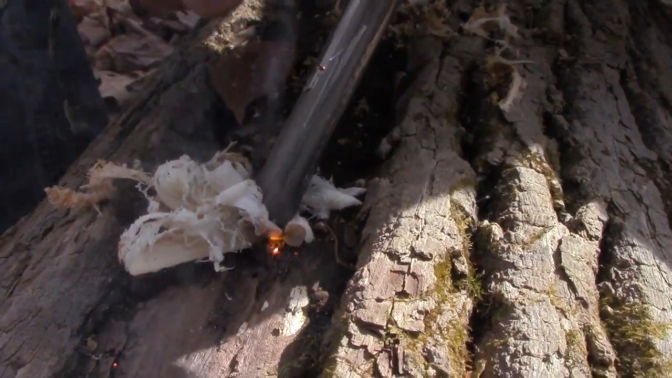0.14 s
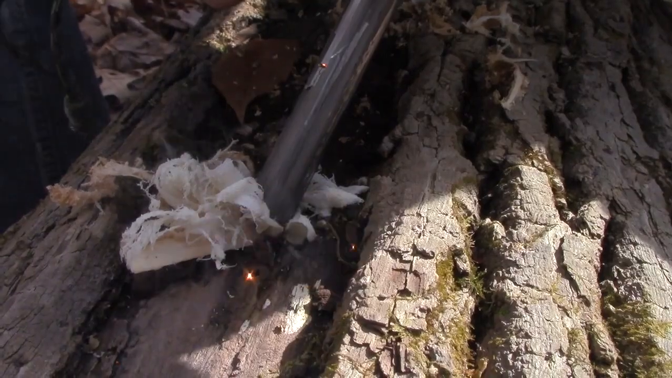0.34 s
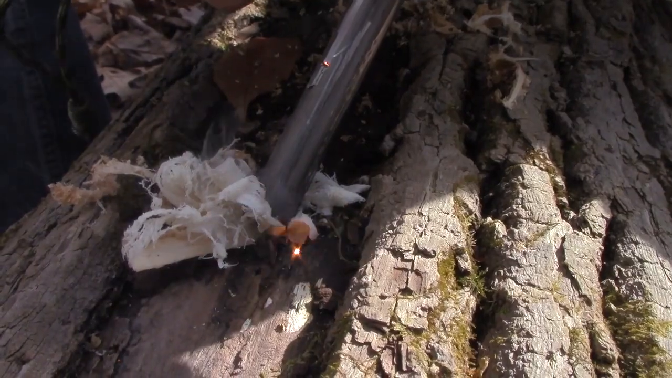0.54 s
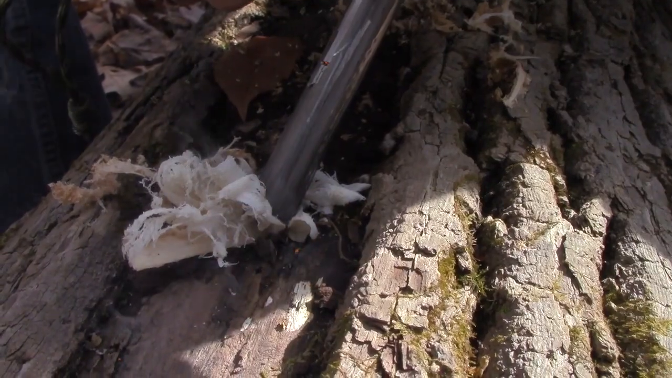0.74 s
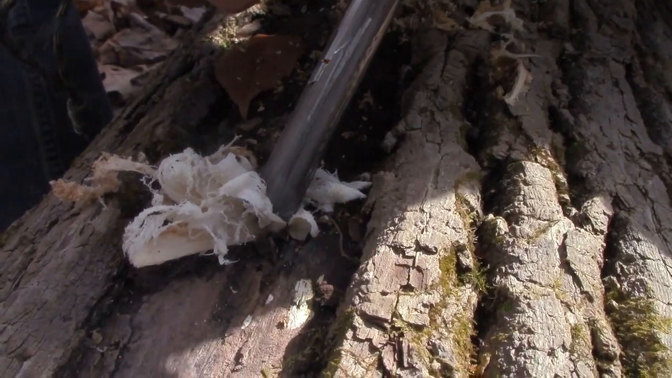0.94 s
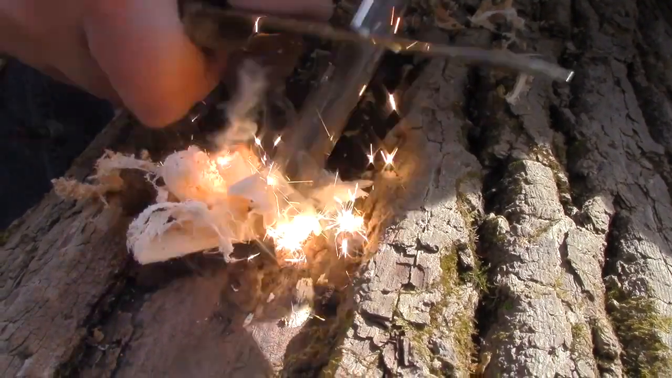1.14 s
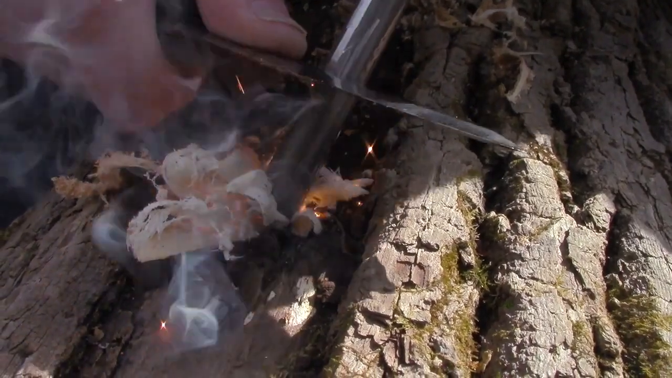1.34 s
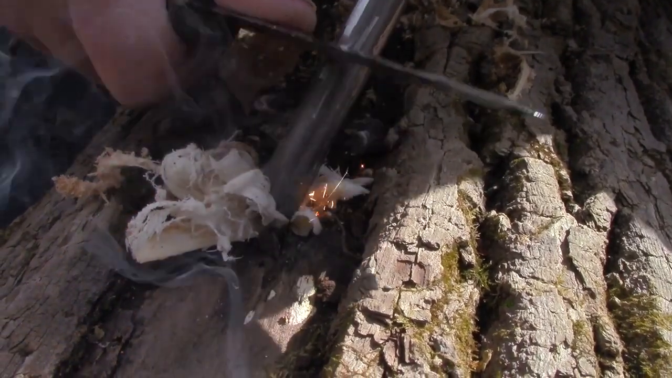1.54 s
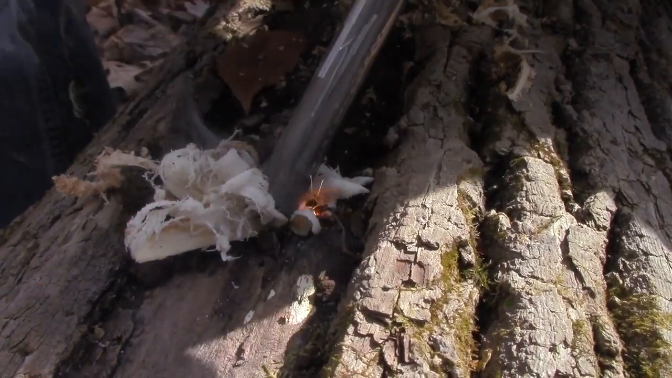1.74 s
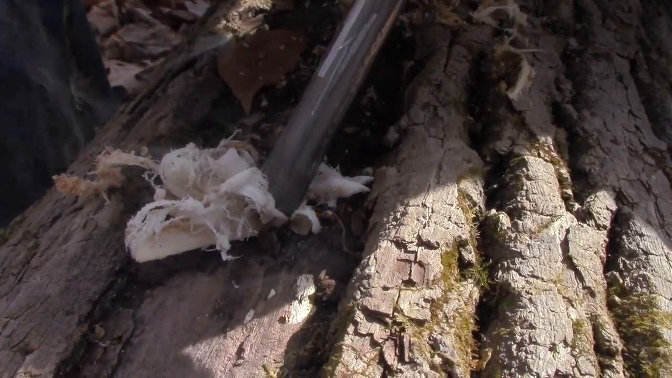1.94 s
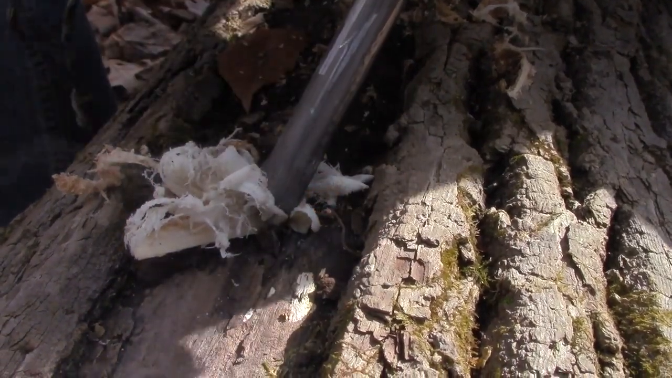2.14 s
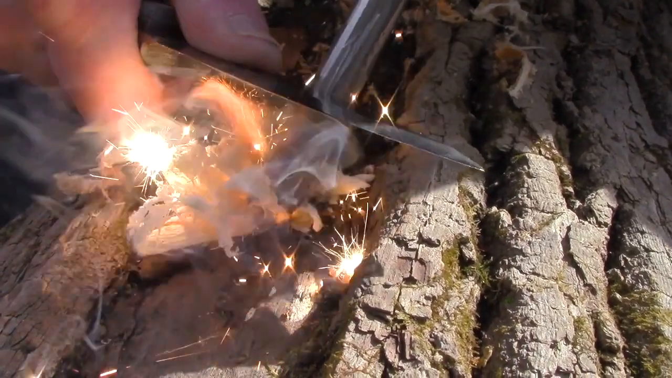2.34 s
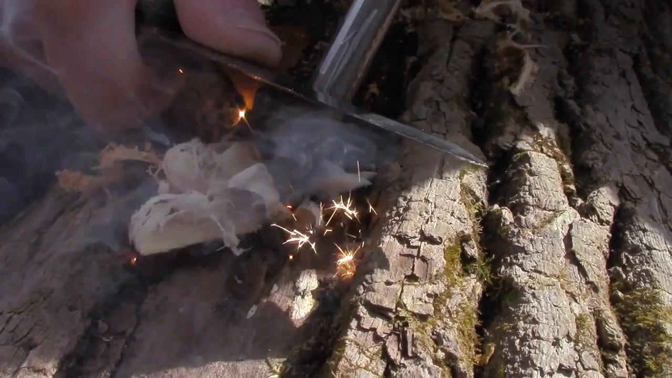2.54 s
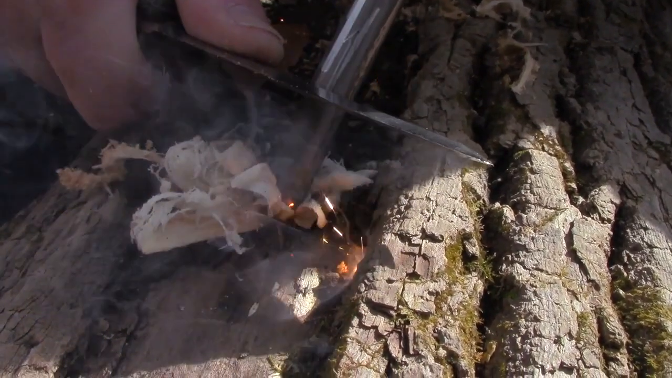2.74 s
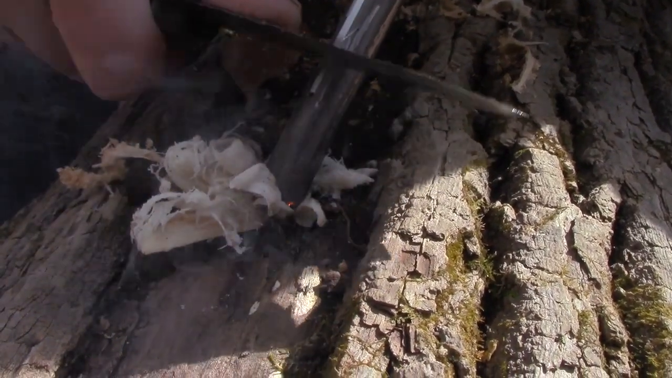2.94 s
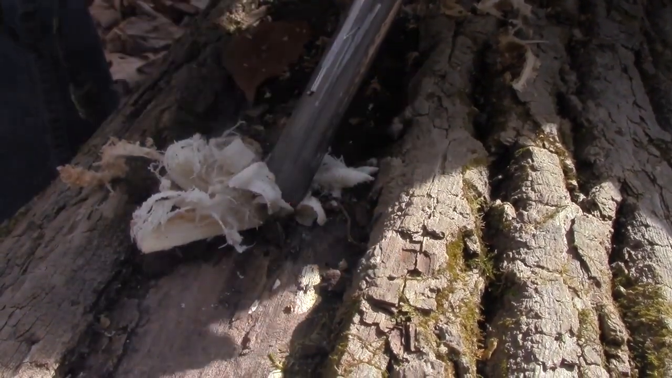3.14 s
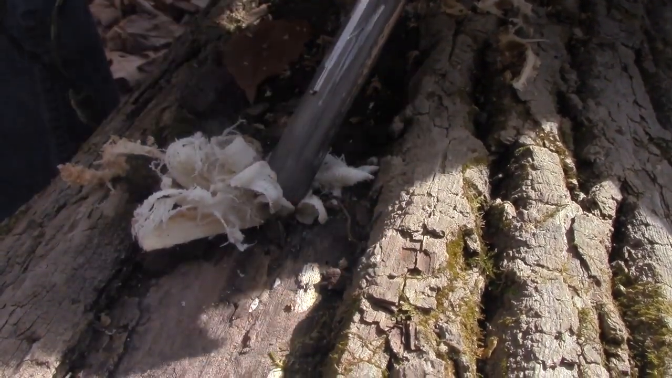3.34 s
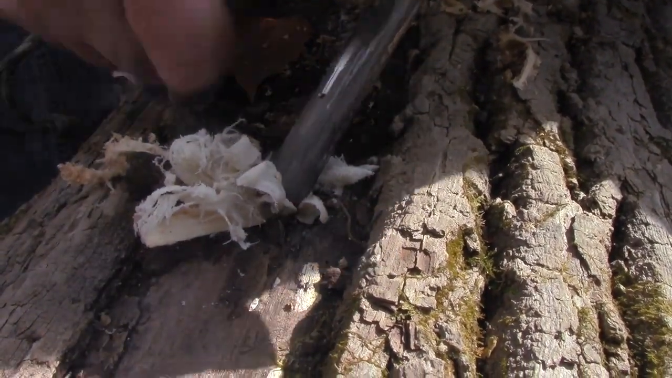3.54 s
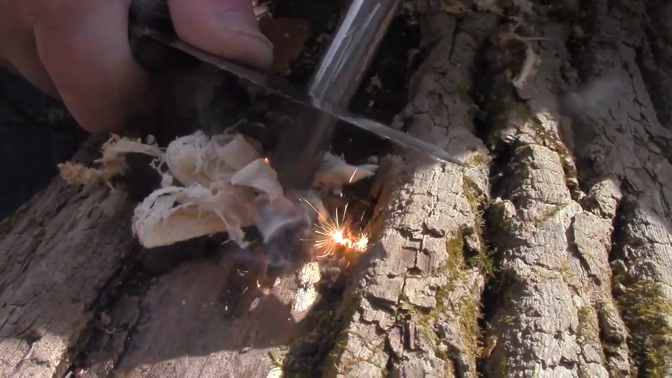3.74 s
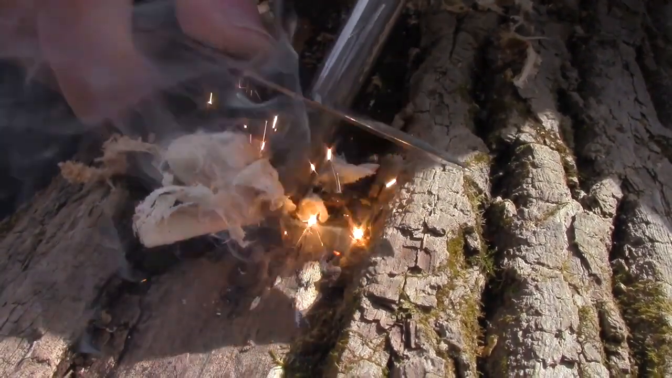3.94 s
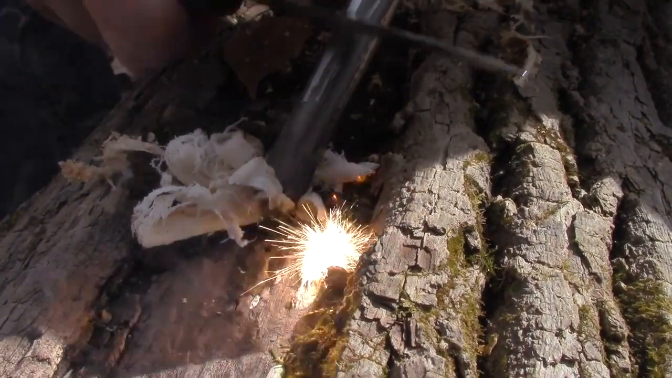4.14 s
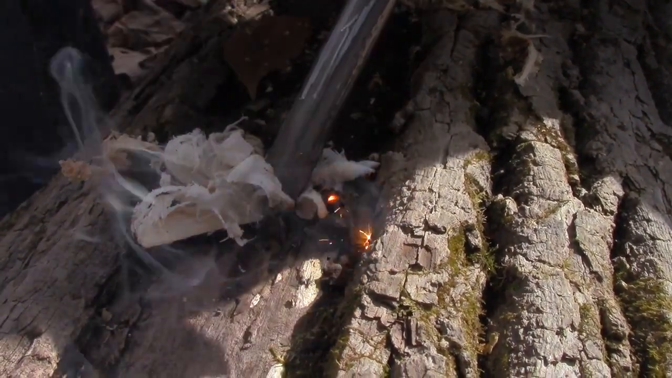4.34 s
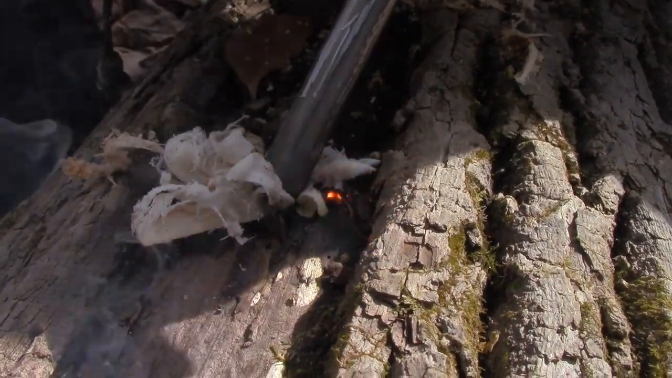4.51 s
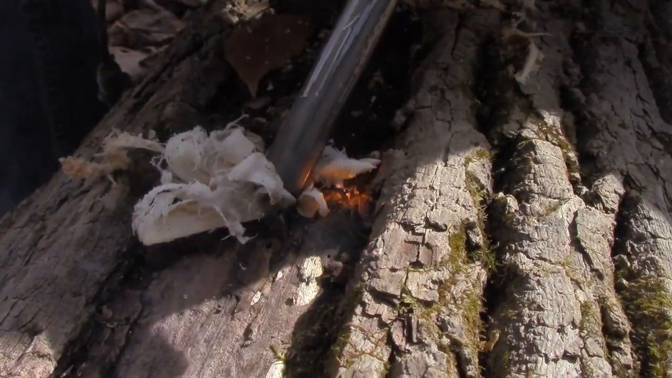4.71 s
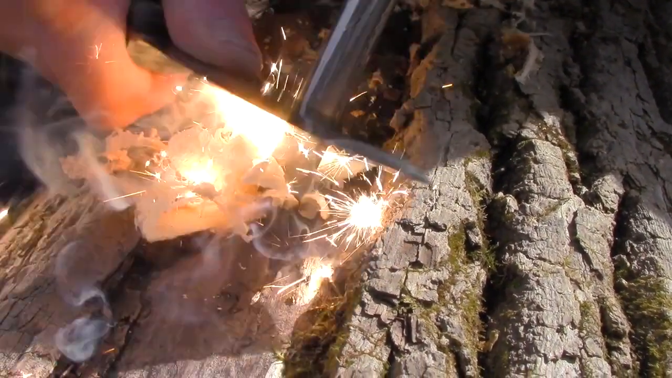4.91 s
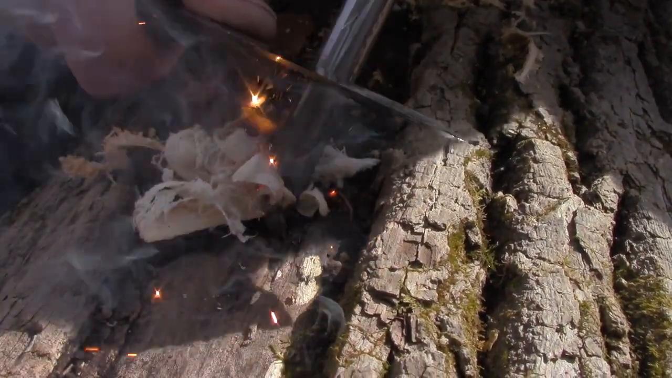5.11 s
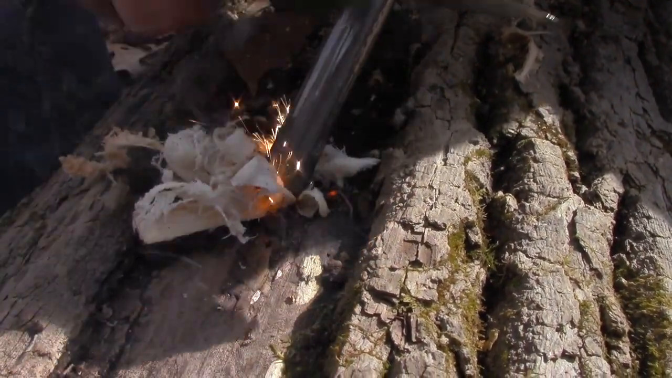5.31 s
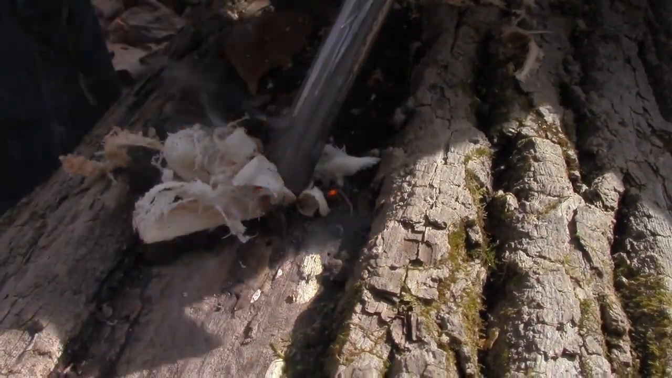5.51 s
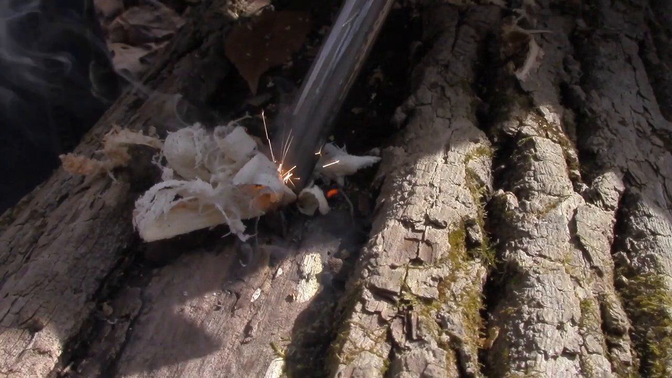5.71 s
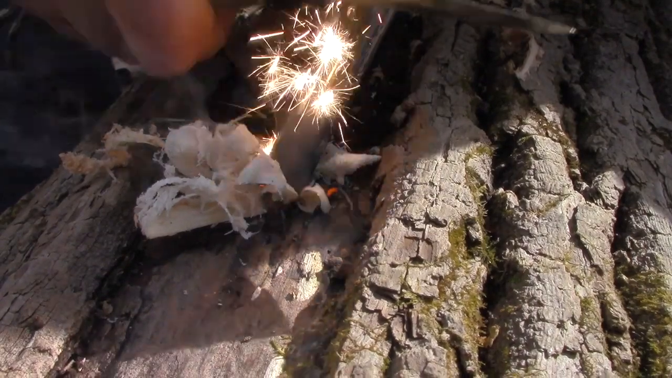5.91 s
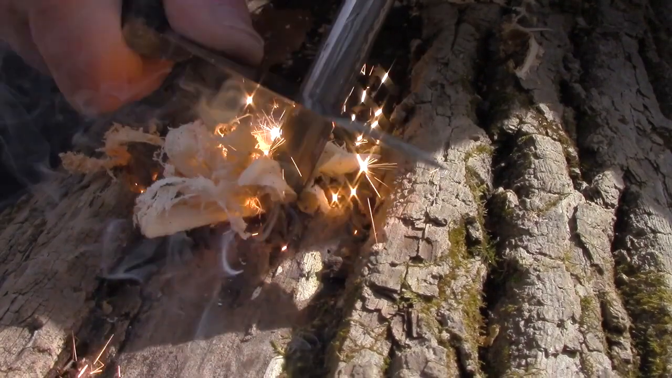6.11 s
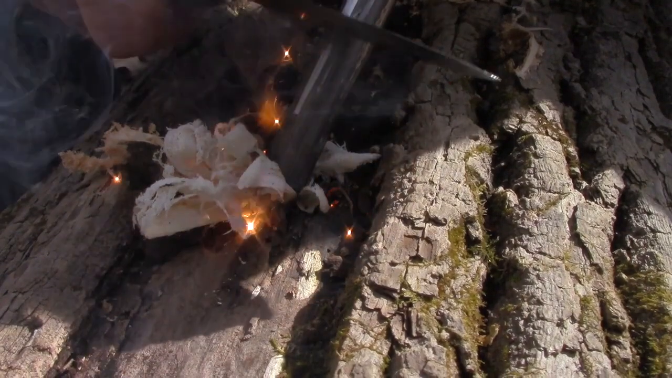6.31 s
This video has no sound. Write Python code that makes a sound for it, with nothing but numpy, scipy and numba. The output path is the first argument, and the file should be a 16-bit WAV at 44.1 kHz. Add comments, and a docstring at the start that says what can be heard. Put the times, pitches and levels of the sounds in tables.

```python
"""Striking a metal fire rod

A steel knife spine rasps down a metal fire rod close by: noise of tearing asperities rings the modes of the steel.
Torn-off shavings fizz, roar and pop as they burn: random grit and clicks through resonances and a broad filter.
Between strokes the blade slides lightly back up: friction noise in lightly damped modes, with taps and a knock.
Far traffic (filtered noise) and a wavering engine hum (a gliding sine) lie underneath."""
import sys
import numpy as np
from scipy import signal
from scipy.fft import rfft, irfft
from scipy.io import wavfile
from scipy.ndimage import uniform_filter1d
from numba import njit

SR = 44100
rng = np.random.default_rng(int(sys.argv[2]) if len(sys.argv) > 2 else 0)


def generate_wav(signal):
    """Clip the signal to [-1, 1] and save it as 16-bit WAV at the path in sys.argv[1]."""
    frames = np.transpose(np.atleast_2d(signal))
    scaled = np.clip(frames, -1, 1) * 32767
    pcm = np.round(scaled).astype(np.int16)
    wavfile.write(sys.argv[1], SR, pcm)


N = 284968

CUT_ATTACK_S, CUT_FADE_S = 0.027, 0.0224  # the fade is the time to fall 60 dB
CUT_SAG_DB_PER_S, SHRILL_SAG_DB_PER_S = 49, 64
JOLT_FADE_S = 0.2  # time to fall 60 dB


def strokes():
    """Superposition: asperities tear and ring the steel while the burning shavings fizz, roar and snap."""
    cut, lowest, treble, thrown, shrill, jolt = cutting_powers()
    burn, roaring, flaring = burning_powers()
    tearing = grit(rate=1600, spread_db=1.0, tail_s=0.00036, bed=1.0)
    sparks = sputter(burn)
    burning = fizz(burn + thrown, sparks) + hisses(tearing) + roar(roaring, cut, sparks) + snaps(flaring)
    return burning + bite(cut, lowest, treble, shrill, burn, tearing) + thuds(jolt)


# The edge cutting into the rod: (time [s], length [s], level [dB]), then relative to the cut:
# (lowest mode of the steel [dB], treble of the steel [dB], sputter of sparks [dB]),
# (jolt through the log, a level of its own [dB]), (shrill mode at the start, relative to the cut [dB])
CUT_EVENTS = [(1.026, 0.081, -10.5, -10.5, -9.5, -4.5, -43, -7),
              (2.194, 0.075, -9.5, -6.5, -8, -5, -33.5, -4.5),
              (3.431, 0.079, -12.5, -5.5, -13.5, -2, -38.5, -5),
              (3.55, 0.068, -12.5, -1.5, -10, -13.5, -30.5, -8),
              (4.806, 0.058, -10.5, -7, -4.5, -7.5, -39, -3.5),
              (5.862, 0.088, -13, -10, -6, -2.5, -43, -1.5), (6.001, 0.071, -14.5, -3, -7, -0.5, -62, -12)]


def cutting_powers():
    """Intermittent friction: each cut shares its power among steel modes, thrown sparks and a jolt."""
    t = np.arange(N) / SR
    cut, lowest, treble, thrown, shrill, jolt = np.zeros((6, N))
    for s, length, db, low_db, treble_db, sparks_db, jolt_db, shrill_db in CUT_EVENTS:
        power = swell(s, CUT_ATTACK_S, length - CUT_ATTACK_S, CUT_FADE_S, db)
        power = power * undb(-CUT_SAG_DB_PER_S * np.abs(t - s)) ** 2
        cut += power
        lowest += power * undb(low_db) ** 2
        treble += power * undb(treble_db) ** 2
        thrown += power * undb(sparks_db) ** 2
        shrill += power * undb(shrill_db - SHRILL_SAG_DB_PER_S * np.abs(t - s)) ** 2
        jolt += swell(s + length / 2, length / 2, 0.0048, JOLT_FADE_S, jolt_db)
    return cut, lowest, treble, thrown, shrill, jolt


# Modes of blade and rod pressed hard together: (frequency [Hz], width [Hz], relative level [dB])
PRESSED_MODES = [(1990, 1200, -10.5), (4430, 2100, -6.5), (6340, 1050, -1.5), (8050, 1150, -4.5),
                 (10970, 2200, -20), (12900, 1300, -17.5)]
STEEL_DB, STEEL_LOW_DB, STEEL_TREBLE_DB = -9, -5, -14  # steel over burning; lowest and treble over steel


def bite(cut, lowest, treble, shrill, burn, tearing):
    """Modal resonance: tearing noise drives the steel, which also rings along with the burning."""
    bands = PRESSED_MODES[:1], PRESSED_MODES[1:3], PRESSED_MODES[3:4], PRESSED_MODES[4:]
    low, middle, upper, high = (
        unit(modes(tearing, band, sway_db=2.44, drift=0.027, steep=True)) for band in bands)
    steel = burn * undb(STEEL_DB) ** 2
    out = smooth(lowest + steel * undb(STEEL_LOW_DB) ** 2) * low
    out = out + smooth(cut + steel) * middle
    out = out + smooth(treble + steel * undb(STEEL_TREBLE_DB) ** 2) * (high + upper)
    return out + smooth(shrill) * upper


def thuds(jolt):
    """Low-frequency structural transmission: each cut jolts the log, heard as noise below 62 Hz."""
    thud = signal.lfilter(*signal.butter(2, 62, fs=SR), rng.standard_normal(N))
    return smooth(jolt) * unit(thud)


# Showers of shavings burning after each full stroke: one list per shower of (time [s], level [dB])
SHOWER_LEVELS = [
    [(1.1, -26.5), (1.125, -13.5), (1.15, -15.5), (1.188, -14.5), (1.21, -14.5), (1.316, -25),
     (1.34, -31.5), (1.49, -52.5)],
    [(2.21, -27.5), (2.27, -12.5), (2.372, -13), (2.398, -24), (2.44, -17), (2.49, -34.5), (2.56, -29),
     (2.72, -26.5), (2.73, -35.5), (2.835, -36.5)],
    [(3.655, -31), (3.679, -19.5), (3.699, -18.5), (3.735, -15), (3.769, -21.5), (3.809, -11), (3.9, -13.5),
     (3.92, -19), (4.12, -41.5)],
    [(4.84, -13.5), (4.885, -8), (4.992, -15), (5.02, -21), (5.145, -43)],
    [(5.89, -31), (5.955, -12), (6.01, -16.5), (6.086, -23), (6.12, -15), (6.19, -24), (6.24, -29),
     (6.27, -29.5)],
]
# Roar over fizz, one for each shower: (relative level [dB])
SHOWER_ROAR = [-1, -1.5, -5, -3, -1.5]
# Single shavings flaring up: (time [s], rise [s], hold [s],
# fade to -60 dB, at least 1 ms [s], level [dB], roar over fizz [dB])
FLARE_EVENTS = [(0.049, 0.0011, 0.0043, 0.16, -15, -7.5), (0.216, 0.011, 0.02, 0.09, -26.5, -5),
                (0.23, 0.015, 0.008, 0.0645, -19.5, -2.5), (0.472, 0.00069, 0.04, -0.11, -14.5, -7),
                (0.481, 0.015, 0.0064, -0.08, -10.5, -22), (1.548, 0.0064, 0.0025, 0.13, -13.5, -8),
                (1.709, 0.00065, 0.03, 0.09, -19, -6.5), (1.748, 0.0073, 0.0016, 0.1239, -17.5, -11),
                (2.463, 0.0044, 0.0051, 0.2, -18, -4), (2.576, 0.0043, 0.019, 0.53, -23.5, -5.5),
                (2.672, 0.022, 0.015, 0.1342, -16.5, -11.5), (3.714, 0.002, 0.0086, -0.04, -11, -8.5),
                (4.15, 0.0025, 0.018, 0.59, -23, -4.5), (4.175, 0.0043, 0.0046, 0.09, -6.5, -8),
                (4.215, 0.0041, 0.024, 0.03, -19.5, -8.5), (4.267, 0.0037, 0.0018, 0.22, -14, -6.5),
                (4.349, 0.0085, 0.004, 0.12, -20.5, -7.5), (4.56, 0.00048, 0.037, 0.33, -15, -12),
                (5.068, 0.0022, 0.0046, 0.21, -21.5, 0.5), (5.146, 0.00033, 0.0056, 0.3, -20, -1.5),
                (5.203, 0.0028, 0.0034, 0.214, -15.5, -2.5), (5.282, 0.0011, 0.092, 0.17, -22.5, -3.5),
                (5.311, 0.0167, 0.019, -0.0151, -18.5, -3), (5.354, 0.0032, 0.013, 0.06, -10, -7),
                (5.74, 0.0011, 0.0015, 0.07, -26.5, -11), (6.256, 0.0012, 0.067, 0.12, -21.5, -4.5)]
EMBER_DB, EMBER_FADE_S = -29.5, 0.34  # each flare leaves a faint glowing tail


def burning_powers():
    """Incoherent addition: the powers of showers and single flares sum, with their roar weighted apart."""
    t = np.arange(N) / SR
    burn, roaring, flaring = np.zeros((3, N))
    for rows, roar_db in zip(SHOWER_LEVELS, SHOWER_ROAR):
        s, db = np.transpose(rows)
        power = undb(np.interp(t, s, db, left=-200, right=-200)) ** 2
        burn += power
        roaring += power * undb(roar_db) ** 2
    for s, rise, hold, fade, db, roar_db in FLARE_EVENTS:
        ember = swell(s, rise, hold, EMBER_FADE_S, db + EMBER_DB)
        power = swell(s, rise, hold, fade, db) + ember
        burn += power
        roaring += power * undb(roar_db) ** 2
        flaring += power
    return burn, roaring, flaring


def sputter(burn):
    """Shot noise: lone sharp cracks of bursting grains ride on denser sputter and outlast it as a flare dies."""
    cracks = grit(rate=90, spread_db=7.5, tail_s=0.00012, bed=0)
    dense = grit(rate=500, spread_db=6.0, tail_s=0.001, bed=0.96)
    # the weaker the burning, the more the cracks stand out
    return dense + undb(-14.5) * (smooth(burn) + 0.0019) ** -.3 * cracks


# Resonances of burning shavings: (frequency [Hz], width [Hz], relative level [dB])
FIZZ_MODES = [(2160, 2920, -1.5), (4030, 950, 5), (5596, 696, 5.5), (7950, 660, 1), (8720, 2200, -5.5),
              (11600, 6700, -22.5)]


def fizz(power, sparks):
    """Resonant colouring: the sputter of burning and thrown sparks fills broad, wandering bands."""
    return smooth(power) * unit(modes(sparks, FIZZ_MODES, sway_db=1.0, drift=0.042))


# Shavings burning with a narrow hiss: (time [s], length [s], level [dB])
HISS_EVENTS = [(4.883, 0.082, -18), (6.084, 0.06, -19)]


def hisses(tearing):
    """Narrow-band noise: a single resonance of the fizz sounds alone."""
    power = sum(swell(s, CUT_ATTACK_S, length - CUT_ATTACK_S, length, db) for s, length, db in HISS_EVENTS)
    return smooth(power) * unit(modes(tearing, FIZZ_MODES[2:3], sway_db=3.5, drift=0.017, steep=True))


# Spectrum of the roar: (frequency [Hz], relative spectral density [dB per Hz])
ROAR_SPECTRUM = [(25, -9), (80, -6), (290, 2), (620, 5), (1100, 4), (2200, 4), (5000, -54)]
ROAR_SURGE_DB = 0.5  # rms of the uneven surging


def roar(roaring, cut, sparks):
    """Broadband combustion noise: the sputter, filtered toward the low end, surges unevenly."""
    level = undb(2.5) * smooth(roaring + undb(-16.0) ** 2 * cut)
    return level * undb(ROAR_SURGE_DB * walk(30)) * unit(colour(sparks, ROAR_SPECTRUM))


# The bare click of a bursting grain: (frequency [Hz], width [Hz], relative level [dB])
SNAP_MODE = [(5350, 6100, -6)]


def snaps(flaring):
    """Impulsive excitation: random short cracks of flaring shavings ring one very broad resonance."""
    cracks = grit(rate=140, spread_db=3.0, tail_s=.00006, bed=0)
    return undb(-10) * smooth(flaring) * unit(modes(cracks, SNAP_MODE, sway_db=2.5))


# Sparks popping: (time [s], relative level [dB], thump over crack [dB])
POP_EVENTS = [(0.053, 6.5, -26), (0.057, 2, -24), (0.476, -4, -27), (0.5476, -17.5, -35),
              (0.6261, -15, -14.5), (0.767, -29, -25), (1.329, -2.5, -10), (1.3725, -10.5, -5),
              (1.413, -21, -17), (1.449, -22.5, -23), (1.5429, -3.5, -8.5), (1.708, 1.5, -8),
              (2.443, -3, -20.5), (2.5, -4.5, 0.5), (2.547, -2, -2), (2.5743, -1, -28), (2.653, -0.5, -32),
              (2.6662, -3.5, -32), (2.8114, -5, -43), (3.598, 2, -23), (3.6039, 1, -8), (3.61, -2, -13),
              (3.628, -2, -3.5), (3.713, 10.5, -19.5), (4.0428, -2.5, -5), (4.1565, -5, 5.5),
              (4.2415, -3, -31), (4.285, -2.5, -27), (4.437, -22, -25), (4.5246, 0.5, -13),
              (4.5612, 6.5, -17), (4.613, 0, 0), (4.621, 1.5, -32), (4.709, -12, -17), (5.0518, -1.5, 0),
              (5.1484, 15, -8), (5.261, -15, -22), (5.286, -5.5, -31), (5.325, -4, -28), (5.3572, -2, -12),
              (5.7415, -8, -7), (6.016, -3, -14.5), (6.271, 1, -11)]


def pops():
    """Impulse response: each bursting spark is a click and a short hiss, with the same burst as a thump."""
    crack, thump = np.zeros((2, N))
    t = np.arange(1024) / SR
    for s, db, thump_db in POP_EVENTS:
        burst = 0.13 * rng.standard_normal(len(t)) * np.exp(-t / 0.0018)
        burst[:2] += [1.9, -.45]  # the click
        i = int(s * SR)
        crack[i:i + len(t)] += undb(db) * burst
        thump[i:i + len(t)] += undb(db + thump_db) * burst
    out = undb(5.0) * modes(crack, FIZZ_MODES, sway_db=1.0)
    out = out + modes(crack, SNAP_MODE, sway_db=3)
    return out + undb(9.5) * colour(thump, ROAR_SPECTRUM)


# Light contacts of the blade sliding on the rod: (time [s], length [s], level of the middle mode [dB],
# high modes over it [dB], lowest modes over it [dB])
SLIDE_EVENTS = [(0, 0.19, -43.5, -7, -2), (0.098, 0.06, -41.5, 8, 3.5), (1.597, 0.11, -40.5, 0, 1),
                (2.927, 0.29, -47.5, -4, 0), (2.94, 0.029, -33, -5, 0), (3.023, 0.063, -47, 6, -1),
                (4.127, 0.049, -34.5, 0, 7.5), (4.425, 0.098, -44.5, -0.5, 2.5),
                (5.608, 0.045, -45, 1, 1.5), (6.36, 0.072, -38, -6.5, -3.5), (6.4, 0.051, -44.5, 5, -2)]
# Modes of blade and rod barely touching: (frequency [Hz], width [Hz], relative level [dB])
LIGHT_MODES = [(1145, 220, 3), (1845, 150, 5.5), (2826, 180, 6.5), (4350, 4000, 9), (6480, 790, 16.5),
               (8360, 270, 4), (12700, 800, 0)]
SLIDE_EDGE = 0.15  # fade-in as a share of a contact's length


def slides():
    """Light friction into barely damped modes of blade and rod; the lowest and the high ones come and go."""
    middle_power, high_power, lowest_power = np.zeros((3, N))
    for s, length, db, high_db, lowest_db in SLIDE_EVENTS:
        edge = SLIDE_EDGE * length
        power = swell(s - edge, edge, length, 0.089, db)
        middle_power += power
        high_power += power * undb(high_db) ** 2
        lowest_power += power * undb(lowest_db) ** 2
    rubbing = grit(rate=900, spread_db=3.0, tail_s=0.0014, bed=1.0)
    lowest = unit(modes(rubbing, LIGHT_MODES[:2], sway_db=3.5, drift=0.043))
    middle = unit(modes(rubbing, LIGHT_MODES[2:3], sway_db=1.5, drift=.008))
    high = unit(modes(rubbing, LIGHT_MODES[3:], sway_db=2.0, drift=0.012, steep=True))
    return np.sqrt(lowest_power) * lowest + np.sqrt(middle_power) * middle + np.sqrt(high_power) * high


# The blade bumping the rod once: (time [s], level [dB])
TAP_EVENTS = [(1.61, -16), (6.363, -16.5)]
TAP_PUSH_S = 0.0005  # time constant of the onset


def taps():
    """Free vibration: a tap sets two low modes of the steel ringing as decaying sines."""
    t, out = np.arange(N) / SR, 0
    for s, db in TAP_EVENTS:
        age = np.maximum(t - s, 0)
        onset = 1 - np.exp(-age / TAP_PUSH_S)
        for hz, width, mode_db in LIGHT_MODES[1:3]:
            gain = undb(db + mode_db - LIGHT_MODES[2][2])
            ringing = np.exp(-np.pi * width * age / 2) * np.sin(2 * np.pi * hz * age)
            out = out + gain * onset * ringing
    return out


# The rod knocking dully on the log: (time [s], level [dB])
KNOCK_EVENTS = [(0.144, -23.5)]
KNOCK_HZ, KNOCK_FADE_S = 197, 0.077  # the fade is the time to fall 60 dB


def knocks():
    """Damped oscillation: a knock rings the log at one low frequency."""
    t, out = np.arange(N) / SR, 0
    for s, db in KNOCK_EVENTS:
        age = np.maximum(t - s, 0)
        out = out + undb(db - 60 * age / KNOCK_FADE_S) * np.sin(2 * np.pi * KNOCK_HZ * age)
    return out


# Spectrum of far traffic: (frequency [Hz], relative level [dB])
TRAFFIC_SPECTRUM = [(25, -16.5), (100, -12.5), (230, -9.5), (400, -20.5), (830, -17.5), (1900, -32),
                    (3200, -37.5), (5500, -35), (9000, -43.5), (15700, -45)]


def traffic():
    """Stationary noise: far traffic is a steady rumble of fixed spectrum, at -42 dB rms."""
    return undb(-42) * unit(colour(rng.standard_normal(N), TRAFFIC_SPECTRUM))


# Distant engine: (time [s], frequency [Hz], level [dB])
ENGINE_HUM = [(0, 172.4, -64), (1.8, 148, -44.5), (2.5, 151.9, -41), (3.4, 166.6, -46), (4.3, 159, -62.5)]


def engine():
    """Frequency modulation: one engine tone glides, wavers and swells in the distance."""
    s, hz, db = np.transpose(ENGINE_HUM)
    t = np.arange(N) / SR
    pitch = np.interp(t, s, hz) + 0.72 * walk(10.0)
    return undb(np.interp(t, s, db)) * np.sin(2 * np.pi * np.cumsum(pitch) / SR)


def modes(x, table, sway_db, drift=0.054, steep=False):
    """Modal sum: each resonance swells, sinks and wanders alone (drift: rms share) as the contact point moves."""
    out = 0
    for k, (hz, width, db) in enumerate(table):
        centre = hz * (1 + drift * walk(30))
        ring = svf(x + 1e-18, centre, 1. * width)
        if steep:  # a second pass leaves dark valleys between the modes
            ring = svf(ring, centre, 1. * width)
        else:  # neighbouring modes alternate in sign
            ring = (-1) ** k * ring
        out = out + undb(db + sway_db * walk(55)) * ring
    return out


@njit
def svf(x, hz, width):
    """State-variable resonator: a band-pass with a moving centre, gain 1 at the centre."""
    y, band, low = np.empty(len(x)), 0., 0.
    for i in range(len(x)):
        g, k = np.tan(np.pi * hz[i] / SR), width / hz[i]
        v = (band + g * (x[i] - low)) / (1 + g * (g + k))
        band, low, y[i] = 2 * v - band, low + 2 * g * v, k * v
    return y


def grit(rate, spread_db, tail_s, bed):
    """Shot noise: random bursts (rate per second) with sharp starts and long-tailed sizes, over an even bed."""
    where, size = rng.random(N), rng.exponential(size=N)
    kicks = (where < rate / SR) * undb(spread_db * np.minimum(size, 3.3))
    bursts = unit(signal.lfilter([1], [1, -np.exp(-1 / (tail_s * SR))], kicks))
    return unit((bed + bursts) * rng.standard_normal(N))


def swell(s, rise, hold, fade, db):
    """Power envelope: the amplitude rises from a gentle start, holds, then falls 60 dB in fade seconds."""
    rise, fade, out = max(rise, 1e-4), max(fade, 1e-3), np.zeros(N)
    span = slice(max(int(s * SR), 0), int((s + rise + hold + 2 * fade) * SR))
    t = np.arange(N)[span] / SR - s
    fall_db = 60 * np.maximum(t - rise - hold, 0) / fade
    amplitude = np.clip(t / rise, 0, 1) ** 1.51 * undb(db - fall_db)
    out[span] = amplitude ** 2
    return out


def smooth(power):
    """Power to amplitude by the square root, averaged over 30 samples."""
    return uniform_filter1d(np.sqrt(power), size=30)


def walk(rate):
    """Low-pass random process: a slow wander of rms 1, with new values drawn at rate [Hz]."""
    k = int(SR / rate)
    steps = np.repeat(rng.standard_normal(N // k + 1), k)
    return unit(uniform_filter1d(uniform_filter1d(steps, k), k)[:N])


def colour(x, points):
    """Minimum-phase filter: causal, with the gain of (Hz, dB) points, from the folded cepstrum."""
    hz, db = np.transpose(points)
    f = np.linspace(1, SR / 2, 2049)
    cepstrum = irfft(np.log(undb(np.interp(np.log(f), np.log(hz), db))))
    cepstrum[1:2048] *= 2
    cepstrum[2049:] = 0
    return signal.fftconvolve(x, irfft(np.exp(rfft(cepstrum))))[:N]


def undb(db):
    """Logarithmic level: decibels to amplitude gain."""
    return 10 ** (np.asarray(db) / 20)


def unit(x):
    """Normalisation: scale to rms 1."""
    return x / np.sqrt(np.mean(x ** 2))


def scene():
    """Linear superposition: all sources add at one microphone."""
    return (strokes() + pops() + slides() + taps() + knocks() + traffic() + engine())[None]


def record(dry):
    """Band limiting and saturation: the microphone fades in the top octave, the recorder rounds peaks."""
    microphone = signal.sosfilt(signal.butter(6, 13800, fs=SR, output="sos"), dry)
    rounded = np.tanh(1.152 * microphone) / 1.194
    # the recorder cuts everything above 15750 Hz
    return signal.sosfilt(signal.ellip(12, .2, 80, 15750, fs=SR, output="sos"), rounded)


dry = scene()
out = record(dry)
generate_wav(out)
```